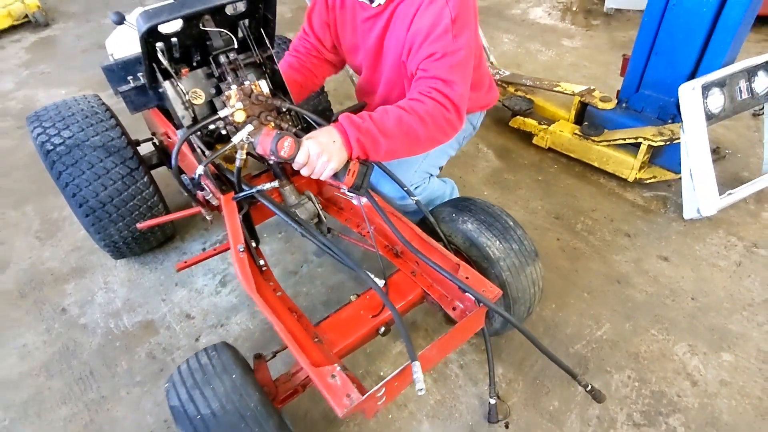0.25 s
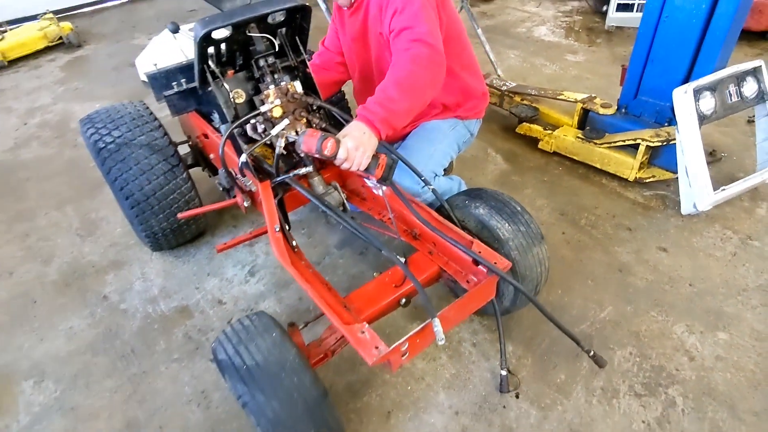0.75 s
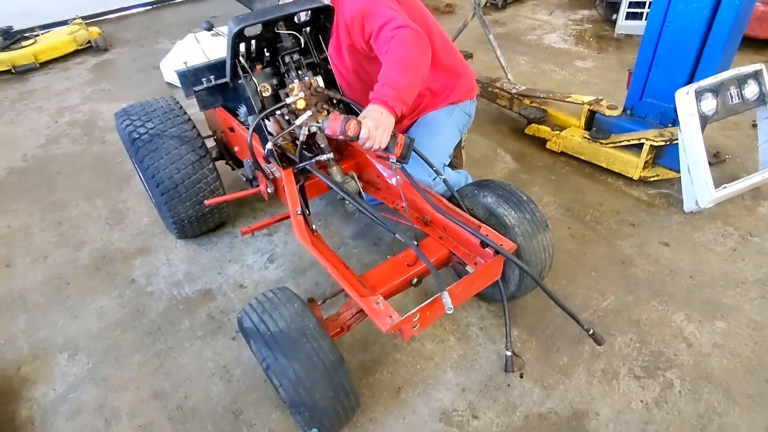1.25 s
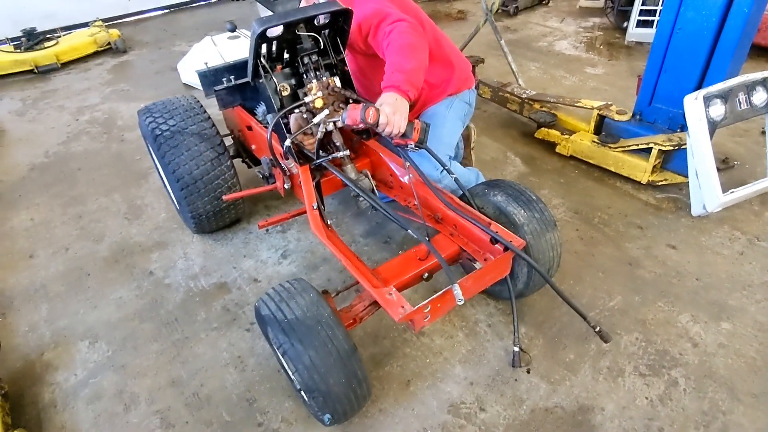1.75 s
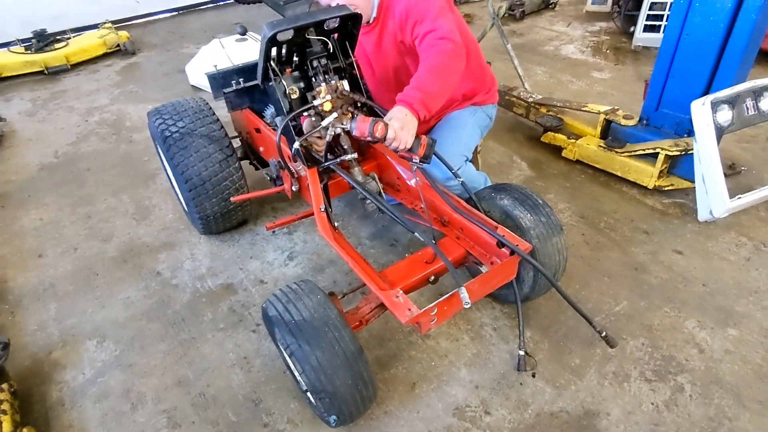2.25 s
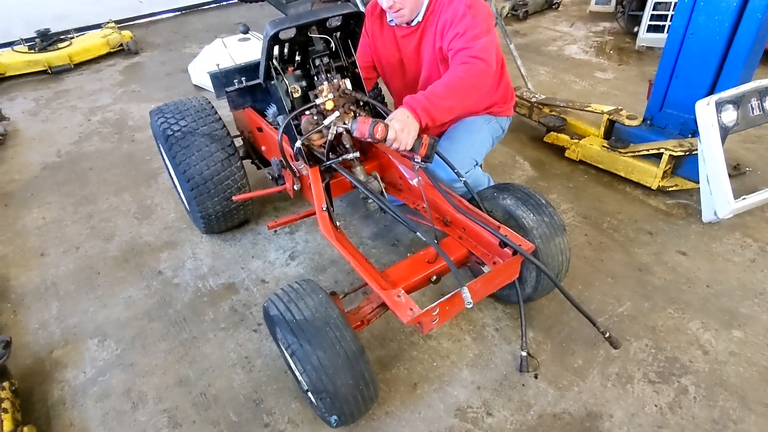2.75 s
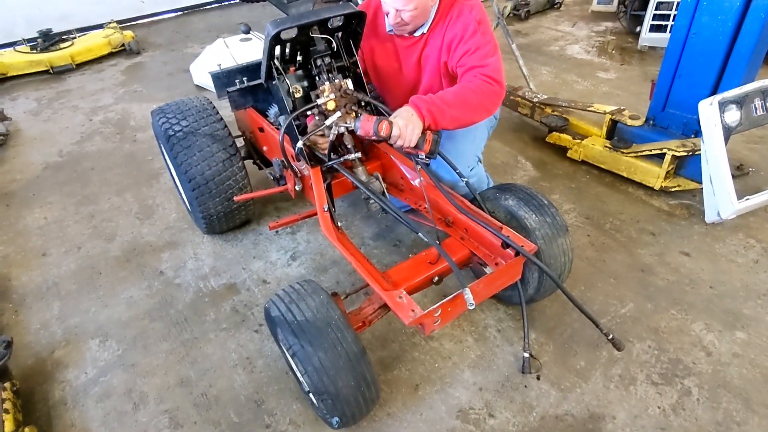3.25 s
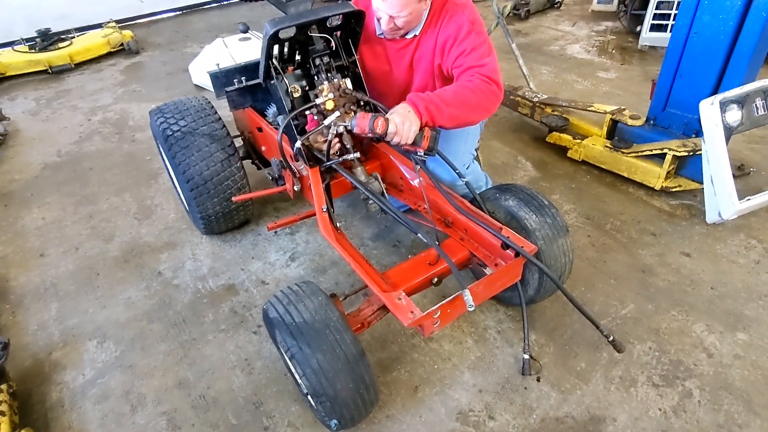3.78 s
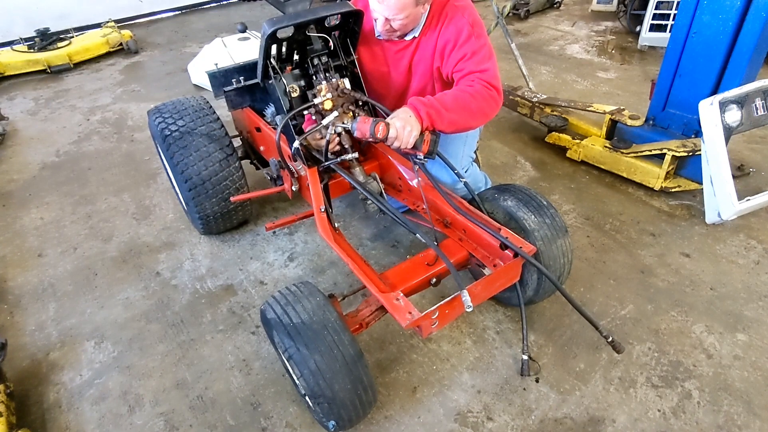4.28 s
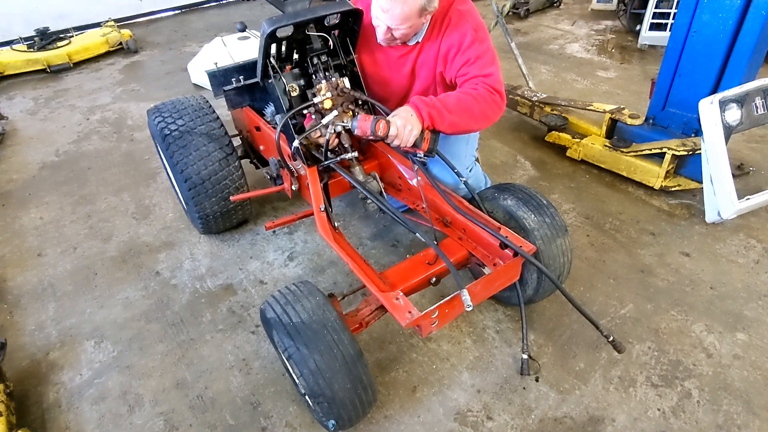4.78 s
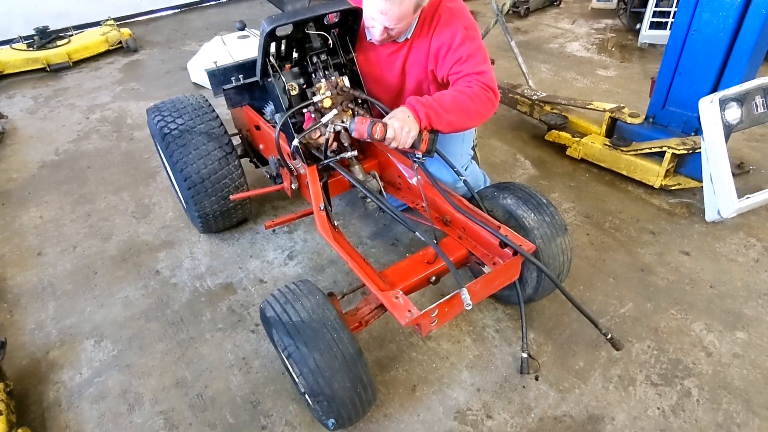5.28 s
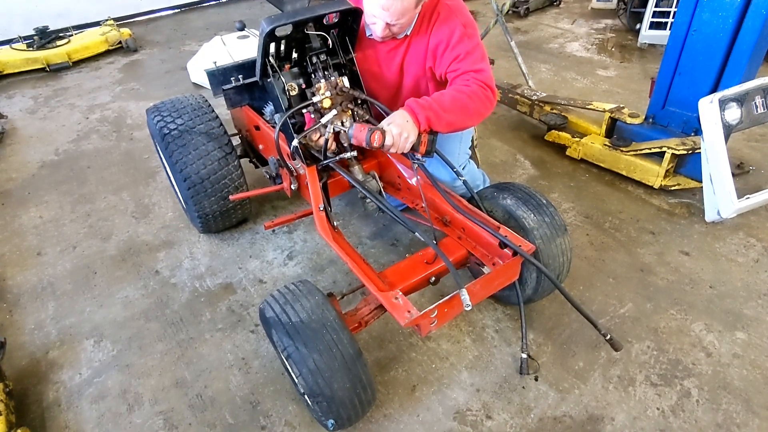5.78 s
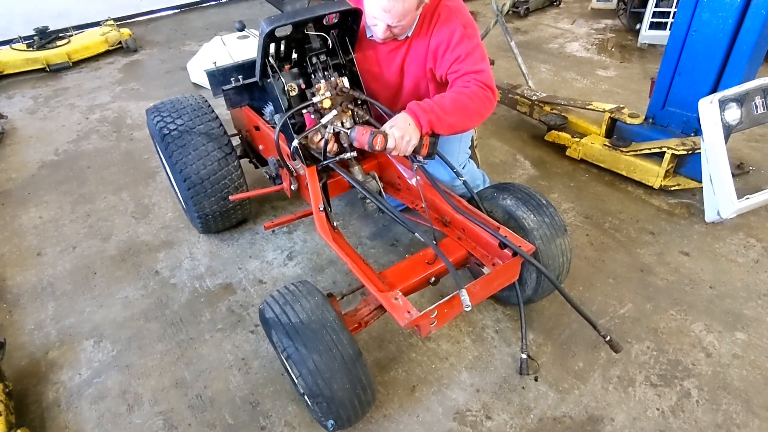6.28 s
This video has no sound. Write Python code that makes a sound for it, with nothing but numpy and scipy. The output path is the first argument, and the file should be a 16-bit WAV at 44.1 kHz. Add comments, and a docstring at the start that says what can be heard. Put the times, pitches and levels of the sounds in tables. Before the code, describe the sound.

The tail of a cordless driver burst fades with a clink and close dull taps. Quiet handling follows: light steel clinks, socket snaps, rubbing cloth and a bump on a metal frame. Around four seconds two bursts churn and rattle, the first harsh with grinding. After a faint hum and squeaks, a short burst precedes a long final one. A hand-held microphone about two metres away hears a reverberant concrete workshop, with low rumble and soft hiss.

```python
"""A cordless driver's last burst dies away, then steel clinks, dull taps near the phone and socket snaps.
A sleeve rubs in noisy strokes; a low hum swells, a squeak follows and the tool bumps the ringing tractor frame.
Two bursts run a bolt in: uneven tooth clicks churn, socket ticks rattle, filtered slips grind, a carrier whistles.
More hum and thin squeaks lead to a short burst and a long last one. All rings in a concrete-floored workshop,
over steady rumble and sinking hiss, and a hand-held phone hears it from two metres."""
import sys
import numpy as np
from scipy import signal
from scipy.fft import rfft, irfft
from scipy.io import wavfile
from scipy.ndimage import uniform_filter1d

SR = 44100
rng = np.random.default_rng(int(sys.argv[2]) if len(sys.argv) > 2 else 0)


def wav_record(signal):
    """Record a signal, one row per channel, as 16-bit PCM in the file named by sys.argv[1]."""
    frames = np.transpose(np.atleast_2d(signal))
    bounded = np.clip(frames, -1, 1)
    # unit amplitude maps onto the largest positive 16-bit level
    quanta = np.round(bounded * 32767).astype(np.int16)
    wavfile.write(sys.argv[1], SR, quanta)


N = 287973
TIME = np.arange(N) / SR
FREQ = np.fft.rfftfreq(8192, 1 / SR)  # grid for every colour filter


def undb(db):
    """Decibels to gain."""
    return 10 ** (np.asarray(db) / 20)


def unit(x):
    """Scale to rms 1."""
    return x / np.sqrt(np.mean(x ** 2) + 1e-20)


def spectrum(rows, hz=FREQ, axis=1):
    """One column of a frequency table, joined on a log axis."""
    rows = np.array(rows)
    return np.interp(np.log(hz + 1), np.log(rows[:, 0]), rows[:, axis])


def response(db):
    """Causal (minimum-phase) impulse response of unit energy with this spectrum."""
    cepstrum = irfft(np.log(undb(db)))
    half = len(cepstrum) // 2
    folded = np.r_[cepstrum[0], 2 * cepstrum[1:half], np.zeros(half)]
    h = irfft(np.exp(rfft(folded)))
    return h / np.linalg.norm(h)


def through(x, h):
    """Pass a sound through an impulse response."""
    return signal.fftconvolve(x, h)[:N]


def walk(rate):
    """Smooth random wander with a spread near 1, drawn rate times a second."""
    k = int(SR / rate)
    steps = np.repeat(rng.standard_normal(N // k + 1), k)
    return unit(uniform_filter1d(steps, k)[:N])


def held(start, end, attack, release):
    """Full strength from start to end, with exponential flanks."""
    return np.exp(np.minimum(TIME - start, 0) / attack - np.maximum(TIME - end, 0) / release)


def swell(start, length):
    """One smooth rise and fall."""
    return np.sin(np.pi * np.clip((TIME - start) / length, 0, 1))


def ring(modes):
    """Decaying modes with alternating signs, unit energy."""
    t = TIME[:SR // 2]
    h = 0
    for k, (hz, db, t60) in enumerate(modes):
        h = h + undb(db - 60 * t / t60) * np.sin(2 * np.pi * hz * t) * (-1) ** k
    return h / np.linalg.norm(h)


def blow(s, db, decay):
    """A contact that breaks up into dying chatter; db is its level over 10 ms."""
    t = TIME[:SR // 8]
    push = rng.standard_normal(len(t)) * np.exp(-t / decay)
    out, start = np.zeros(N + len(t)), int(s * SR)
    out[start:start + len(t)] = push / np.linalg.norm(push) * undb(db) * np.sqrt(SR / 100)
    return out[:N]


def strikes(rows):
    """Single clean impulses; dB is the level over 10 ms."""
    out = np.zeros(N)
    for s, db in rows:
        out[int(s * SR)] = undb(db) * np.sqrt(SR / 100)
    return out


def trigger(knee=3.5, rest_hz=15):
    """Each pull spins the motor up and lets it run down, setting speed, source strengths and tightness 0-1."""
    # trigger pulls: (press [s], release [s], run-down time constant [s], top coil switching rate [Hz],
    # gear load [dB], whistle offset [dB], bolt starts to tighten [s], tightening time constant [s],
    # rattle drive relative to gear drive when tight [dB])
    pulls = [(-.15, .035, .07, 492.3, 1, .5, 0.1, 0.017, -16.5),
             (3.995, 4.171, .028, 681, 0.7, -0.5, 4.07, .06, -6.5),
             (4.449, 4.544, .015, 22.9, 2.5, 1.5, 4.48, 0.043, -15),
             (5.698, 5.794, .015, 200.1, 1, 1.5, 6, 0.037, -19),
             (6.096, 6.6, .02, 869.2, 0, -5, 6.21, 0.12, -4.5)]
    full_speed_hz, spin_up_hz_per_s, switch_s = 898, 7300, 0.005
    # drive levels ahead of the mix: gears at full speed, whistle at half speed, rattle against gears on a free bolt
    gear_db, gear_speed_power, whistle_base_db, free_rattle_db = -30, 1.384, -49, -17
    switch_hz = gear = rattle = whine = tightness = 0
    for press, release, run_down, top_hz, load_db, whistle_db, tightens, tighten_s, tight_db in pulls:
        # the soft start climbs steadily, then bends over to the top rate
        ramp = spin_up_hz_per_s * np.maximum(TIME - press, 0) / top_hz
        soft_start = ramp / (1 + ramp ** knee) ** (1 / knee)
        hz = top_hz * soft_start * held(press, release, switch_s, run_down)
        speed = np.clip(hz / full_speed_hz, 0, 1)
        # the gears grow louder with speed; the socket rattles harder as the bolt tightens
        churn = undb(gear_db + load_db) * speed ** gear_speed_power
        tight = 1 - np.exp(-np.maximum(TIME - tightens, 0) / tighten_s)
        chatter = churn * undb(free_rattle_db + tight * (tight_db - free_rattle_db))
        # the controller chops the current hardest at half speed and stops soon after release
        chop = 2 * np.sqrt(speed * (1 - speed)) * held(press, release, switch_s, switch_s)
        switch_hz, gear, rattle = switch_hz + hz, gear + churn, rattle + chatter
        whine = whine + undb(whistle_base_db + whistle_db) * chop
        tightness = np.where(TIME > press, tight, tightness)
    return np.maximum(switch_hz, rest_hz), gear, rattle, whine, tightness


def gears(switch_hz, count=16, scatter_db=4, click_db=-5, wobble_db=-1.5, jitter=.025):
    """Teeth click in a pattern that repeats each turn and slide in between; the housing rings."""
    # gear housing and frame as the teeth shake them: (frequency [Hz], colour [dB per Hz])
    housing = [(50, -55), (140, -23), (250, -16), (480, -20.5), (750, -16), (1050, -13), (1450, -5.5),
               (1950, -6), (2600, -7), (3200, -9.5), (3700, -14), (7000, -19), (11000, -23.5), (15500, -46)]
    # their resonances: (frequency [Hz], width [Hz], boost [dB])
    resonances = [(785, 220, 3), (1406, 105, 4.5), (1620, 55, -4), (3123, 123, 8.5), (7070, 270, 7)]
    # two teeth meet per coil switching cycle
    mesh = np.cumsum(2 * switch_hz * (1 + jitter * walk(60))) / SR
    # backlash lets every tooth land a little early or late
    backlash = .07 * walk(1500)
    tooth = np.maximum.accumulate(np.abs(mesh + backlash)).astype(int)
    wear = rng.standard_normal(count)[tooth % count]
    click_gain = undb(9.2 * wear + scatter_db * rng.standard_normal(N))
    clicks = np.diff(tooth, prepend=0) * click_gain / np.sqrt(switch_hz)
    slide = rng.standard_normal(N) * np.exp(-(mesh % 1) / 0.69)
    # the spindle runs slightly off axis, so the load swells once a turn, every 110 teeth
    load = undb(wobble_db * np.sin(2 * np.pi * mesh / 110))
    body_db = spectrum(housing)
    for hz, width, db in resonances:
        body_db = body_db + db / (1 + (2 * (FREQ - hz) / width) ** 2)
    return unit(through(load * (undb(click_db) * unit(clicks) + unit(slide)), response(body_db)))


def socket_rattle(strength, rate=900, spread_db=4, flutter_db=2):
    """The loose socket chatters on the bolt head in dense uneven ticks, rate per second on average."""
    # loose socket on the bolt head: (frequency [Hz], colour [dB per Hz])
    rattle_colour = [(50, -17), (90, 0), (140, 14.5), (200, 7.5), (330, 4), (480, 2.5), (800, 9),
                     (1500, 10.5), (4000, 7), (7000, 8.5), (11000, 4), (13500, 11.5), (16000, 1.5)]
    landed = rng.random(N) < rate / SR
    force = undb(spread_db * np.minimum(rng.exponential(size=N), 4))
    ticks = landed * force * rng.choice([-1, 1], N)
    smear = rng.standard_normal(SR // 100) * np.exp(-TIME[:SR // 100] / .0012)
    chatter = unit(through(ticks, smear)) * undb(flutter_db * walk(70))
    return through(chatter * strength, response(spectrum(rattle_colour)))


def grinding(fade=0.022, slip_db=3):
    """The thread binds and grinds: uneven slips ring steel resonances, several of which may overlap."""
    # grinds: (start [s], end [s], frequency [Hz], width [Hz], level [dB])
    grinds = [(4.018, 4.174, 1940, 356, -42), (4.041, 4.145, 3150, 350, -46), (4.116, 4.18, 875, 392, -45),
              (6.208, 6.243, 3069, 450, -36), (6.256, 6.526, 1525, 422, -33)]
    out = 0
    for start, end, hz, width, db in grinds:
        binding = np.clip(np.minimum(TIME - start, end - TIME) / fade + .5, 0, 1)
        slips = unit(rng.standard_normal(N) * undb(slip_db * walk(250)))
        steel = response(-10 * np.log10(1 + (2 * (FREQ - hz) / width) ** 4))
        out = out + through(undb(db) * binding * slips, steel)
    return out


def whistle(switch_hz, carrier_hz=7855, lower_db=-3, octave_db=-1):
    """The controller's carrier splits into two tones that part as the motor speeds up, plus one near the octave."""
    carrier = 2 * np.pi * carrier_hz * TIME
    coil = 2 * np.pi * np.cumsum(switch_hz * (1 + 0.019 * walk(90))) / SR
    upper, lower = np.sin(carrier + coil), np.sin(carrier - coil)
    octave = np.sin(2 * carrier - coil / 2)
    return upper + undb(lower_db) * lower + undb(octave_db) * octave


def bearing_down(x, tightness, free_bass_db=-7, bass_hz=604):
    """The tighter the bolt, the more of the tool's bass the frame radiates."""
    lowpass = signal.butter(2, bass_hz, fs=SR, output="sos")
    bass = signal.sosfiltfilt(lowpass, x)
    return x - bass + bass * undb(free_bass_db * (1 - tightness))


def clinks(bright_hz=5000):
    """Steel meets steel: broad cracks of dying chatter, each with its own brightness."""
    # steel contacts: (time [s], level [dB], brightness [dB], chatter decay time constant [s])
    contacts = [(.074, -41, 5, .018), (1.371, -63.5, 5, 0.0053), (1.428, -63, 4, 0.0036),
                (1.629, -49, 3.5, 0.0011), (1.9, -57, 27, 0.017), (2.146, -45, -16, 0.0013),
                (2.295, -44.5, 1.5, 0.0027), (2.308, -46.5, -17, 0.0027), (2.604, -47.5, -2.5, .025),
                (2.79, -69, 14, .006), (3.148, -56.5, 14, 0.0018), (3.242, -59.5, 4, .003),
                (3.298, -57, 3, 0.00087), (3.657, -48, 2.5, 0.0071), (3.69, -52, -23, .004),
                (3.987, -50.5, 7, .005), (4.019, -35, 6.5, 0.0066), (4.045, -33, -6, 0.0034),
                (4.16, -25.5, 11, .004), (4.22, -34.5, -1, .008), (4.931, -65, -12, 0.0024),
                (5.105, -67.5, 12, 0.0073), (5.716, -50.5, 2, 0.0063), (5.773, -45, -13, 0.015),
                (5.835, -52, 0, .012), (6.001, -41.5, -13, 0.0044), (6.412, -26.5, 23, 0.0025),
                (6.52, -25, 19, 0.00092)]
    # colour of a contact: (frequency [Hz], colour [dB per Hz])
    contact_colour = [(150, -29.5), (600, -11.5), (1150, -6), (1540, 3.5), (1950, -5.5), (2500, -1.5),
                      (3200, -3), (3900, -10), (8000, -15), (11000, -17.5), (16000, -16.5)]
    cracks = 0
    for s, db, bright_db, decay in contacts:
        shelf = bright_db * FREQ ** 2 / (FREQ ** 2 + bright_hz ** 2)
        cracks = cracks + through(blow(s, db, decay), response(spectrum(contact_colour) + shelf))
    return cracks


def frame_bumps():
    """The tool bumps the frame: an impulse sets its decaying modes ringing."""
    # bumps: (time [s], level [dB])
    bumps = [(3.659, -41)]
    # frame modes: (frequency [Hz], level [dB], t60 [s])
    frame_modes = [(318, -16, 0.094), (421, -15.5, 0.084), (487, -16.5, 0.091), (710, -6, 0.014),
                   (1050, -8, 0.04), (1394, -5, 0.028), (2130, 2.5, 0.025), (2270, 2.5, 0.028),
                   (3320, -43, .01), (4160, 1.5, 0.0032), (5320, 0.5, 0.0057)]
    return through(strikes(bumps), ring(frame_modes))


def snaps(decay=0.002):
    """The socket snaps against the bolt head and, damped by it, rings high and very briefly."""
    # snaps: (time [s], lower ring level [dB], upper ring level [dB])
    snap_rows = [(1.63, -60.5, -47.5), (2.605, -65, -58), (3.147, -50.5, -53)]
    # the socket's two rings: (frequency [Hz], width [Hz])
    socket_rings = [(8200, 240), (13400, 340)]
    out = 0
    for k, (hz, width) in enumerate(socket_rings):
        pushes = sum(blow(s, levels[k], decay) for s, *levels in snap_rows)
        out = out + through(pushes, response(-10 * np.log10(1 + (2 * (FREQ - hz) / width) ** 2)))
    return out


def rubbing(grain_db=3, attack_share=0.067, release_share=0.21, rest_db=-79):
    """Sleeve and hand stroke the parts; cloth catches and slips unevenly and never quite rests."""
    # strokes: (start [s], length [s], level [dB])
    strokes = [(1.502, 0.52, -73), (1.708, 0.091, -60.5), (2.126, .15, -62.5), (2.995, 0.39, -75),
               (4.615, 0.093, -68)]
    # cloth on parts: (frequency [Hz], colour [dB per Hz])
    rub_colour = [(150, -15), (350, -2.5), (510, -0.5), (700, -8), (1500, 2), (2000, 1.5), (2800, -0.5),
                  (4200, -7), (8000, -21.5), (16000, -16.5)]
    pressure = undb(rest_db)
    for s, length, db in strokes:
        pressure = pressure + undb(db) * held(s, s + length, attack_share * length, release_share * length)
    slips = unit(rng.standard_normal(N) * undb(grain_db * walk(160)))
    return through(slips * pressure, response(spectrum(rub_colour)))


def squeaks(waver=0.023, flutter_db=4):
    """Thin, faint, far tones of unsteady pitch that swell, flutter and fade."""
    # squeaks: (start [s], length [s], pitch [Hz], level [dB])
    squeak_rows = [(3.454, 0.35, 1920, -79), (5.22, 0.29, 1840, -78), (5.448, 0.27, 1360, -81)]
    out = 0
    for s, length, hz, db in squeak_rows:
        tone = np.sin(2 * np.pi * np.cumsum(hz * (1 + waver * walk(64))) / SR)
        out = out + undb(db + flutter_db * walk(38)) * swell(s, length) * tone
    return out


def dull_taps():
    """Dull taps near the phone: impulses ring a few short modes."""
    # taps: (time [s], level [dB])
    tap_rows = [(.042, -37), (.081, -42), (1.629, -57), (2.147, -37), (2.172, -42.5), (3.299, -55.5),
                (4.737, -55.5), (6.002, -38.5)]
    # modes they ring with: (frequency [Hz], level [dB], t60 [s])
    case_modes = [(626, -17, 0.015), (1140, -10, 0.015), (1453, -0.5, 0.022), (1580, -2.5, 0.015),
                  (2660, -8.5, 0.0069), (3250, -13, 0.0078)]
    return through(strikes(tap_rows), ring(case_modes))


def hum(waver=0.018, flutter_db=3):
    """A faint low hum swells and fades: a few close tones that waver on their own."""
    # swells: (start [s], length [s], level [dB])
    hum_swells = [(3.098, 0.43, -73), (4.6, 1.38, -70.5)]
    # tones: (frequency [Hz], level [dB])
    hum_tones = [(155, -7), (188, 7), (203, -7), (240, 7.5)]
    tones = 0
    for hz, db in hum_tones:
        strength = undb(db + flutter_db * walk(26))
        tones = tones + strength * np.sin(2 * np.pi * np.cumsum(hz * (1 + waver * walk(30))) / SR)
    return unit(tones) * sum(undb(db) * swell(s, length) for s, length, db in hum_swells)


def background(rumble_db=-72.5, side_db=-13, waver_db=-0.96, hiss_db=-66, sink_db_per_s=1.17):
    """Low wavering rumble, much alike on both sides, under a soft hiss that slowly sinks."""
    # rumble: (frequency [Hz], colour [dB per Hz])
    rumble_colour = [(15, -57), (25, -30), (70, -4), (241, -5.5), (301, -7.5), (377, -11), (407, -17.5),
                     (525, -8), (619, -43), (667, -16), (900, -13), (1170, -61), (1980, -120)]
    # hiss: (frequency [Hz], colour [dB per Hz])
    hiss_colour = [(350, -24.5), (600, -1.5), (917, -7), (1420, -1.5), (1670, -48), (1840, -3),
                   (2670, -10.5), (7140, -8), (10600, -13), (14400, -10), (15800, -11.5)]
    colours = (rumble_colour, rumble_colour, hiss_colour, hiss_colour)
    mid, side, left, right = (through(rng.standard_normal(N), response(spectrum(c))) for c in colours)
    side = side * undb(side_db)
    rumble = np.array([mid + side, mid - side]) * undb(rumble_db + waver_db * walk(6.5))
    return rumble + np.array([left, right]) * undb(hiss_db - sink_db_per_s * TIME)


def direct(x, count=7):
    """The straight path reaches the left microphone a few samples before the right."""
    return np.array([x, np.r_[np.zeros(count), x[:-count]]])


def workshop(x, wet_db, early_db, early_decay=0.009, alike_hz=550):
    """Quick reflections from floor and frame, then the hall; bass is alike in both ears."""
    # reverberation: (frequency [Hz], t60 [s], level [dB])
    hall = [(150, 1, 8), (540, 0.92, 5), (1720, 1, -2.5), (3300, 1.08, -0.5), (6070, 0.94, -2),
            (9300, 0.59, -0.5), (13900, 0.55, -10.5)]
    # noise in short time-frequency frames, shaped into a decaying echo pattern
    hz, s, field = signal.stft(rng.standard_normal((2, int(1.4 * SR))), SR, nperseg=256)
    t60, hall_db = (spectrum(hall, hz, axis=k)[:, None] for k in (1, 2))
    decay = np.exp(-np.log(1000) * s / t60) * np.sqrt(2 * np.log(1000) / t60 / SR)
    tail = undb(wet_db + hall_db) * decay * (1 - np.exp(-s / 0.015))
    early = undb(early_db) * np.exp(-s / early_decay) * np.sqrt(2 / early_decay / SR) * (s > 0)
    apart = (hz ** 2 / (hz ** 2 + alike_hz ** 2))[:, None]
    ears = np.array([field[0] + apart * field[1], field[0] - apart * field[1]]) / np.sqrt(1 + apart ** 2)
    echoes = signal.istft(ears * (tail + early), SR)[1]
    return np.array([through(x, h) for h in echoes])


def scene():
    """The driver, the handling sounds and the room."""
    switch_hz, gear, rattle, whine, tightness = trigger()
    works = undb(-1.0) * gear * gears(switch_hz) + undb(6) * socket_rattle(rattle)
    driver = bearing_down(works, tightness) + grinding() + whine * whistle(switch_hz)
    handling = clinks() + rubbing() + squeaks()
    knocks = frame_bumps() + snaps()
    taps = dull_taps()
    # the tool shifts in the hand, so its reflections keep changing between two patterns
    sway = 1.2 * walk(9)
    room = sum(workshop(driver * share, wet_db=-1.5, early_db=2.5) for share in (np.cos(sway), np.sin(sway)))
    room = room + workshop(handling, wet_db=2.0, early_db=0.5)
    room = room + workshop(knocks, wet_db=1.0, early_db=0.5, early_decay=0.011)
    # taps so near the phone barely wake the room
    room = room + workshop(taps, wet_db=-11, early_db=-9, early_decay=.005)
    return direct(undb(-3) * driver + handling + knocks + taps) + room + background() + hum()


def record(dry, top_hz=15900):
    """Each of the phone's microphones has its own colour; the top is cut steeply."""
    # the two microphones: (frequency [Hz], left minus right [dB])
    ports = [(700, 0.5), (1150, 2.5), (1550, -5.5), (2300, 0), (3200, 3.5), (5000, 6.5), (8000, 8),
             (12500, 11), (14200, 5), (15500, 4)]
    hz = np.fft.rfftfreq(2 * N, 1 / SR)
    tilt = undb(spectrum(ports, hz) * np.array([[.5], [-.5]]))
    balanced = tilt / np.sqrt(np.mean(tilt ** 2, axis=0))
    coloured = irfft(rfft(dry, 2 * N) * balanced)[:, :N]
    return signal.sosfilt(signal.ellip(10, .2, 70, top_hz, fs=SR, output="sos"), coloured)


dry = scene()
out = record(dry)
wav_record(out)
```